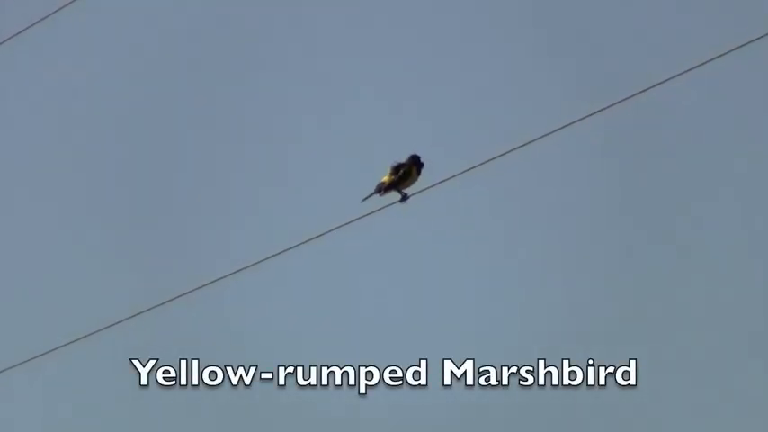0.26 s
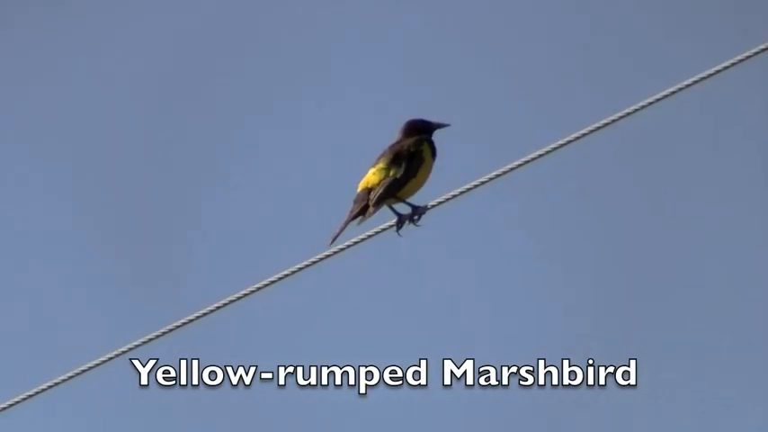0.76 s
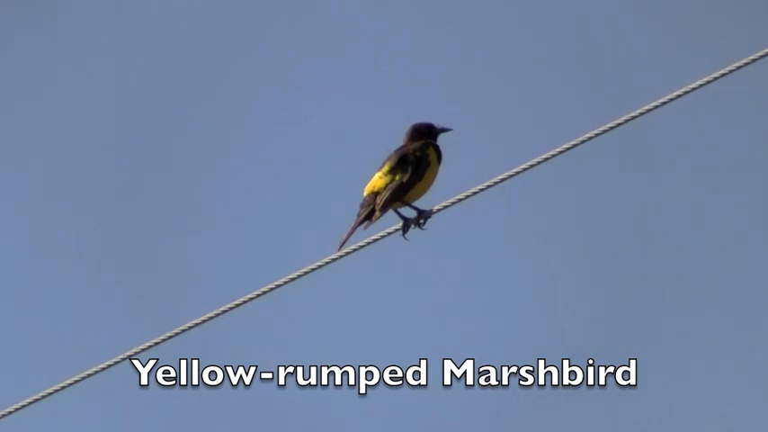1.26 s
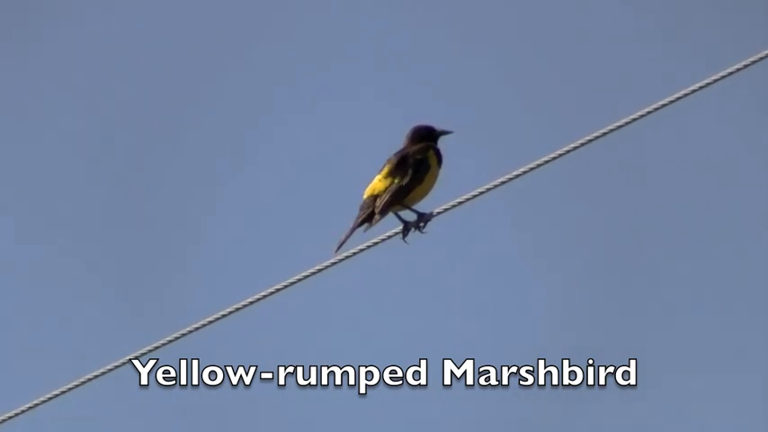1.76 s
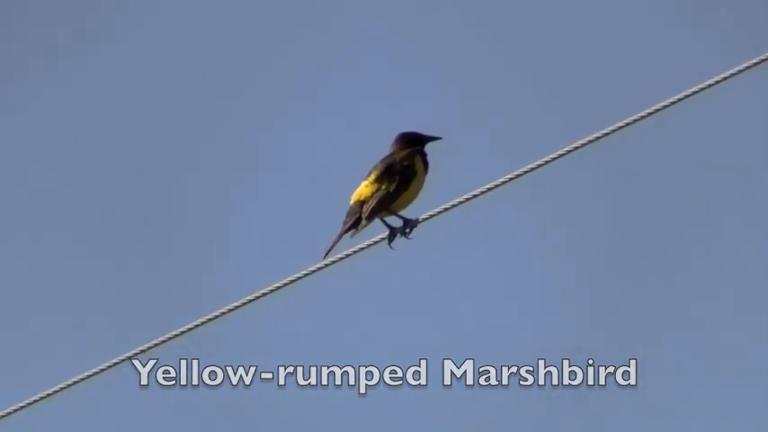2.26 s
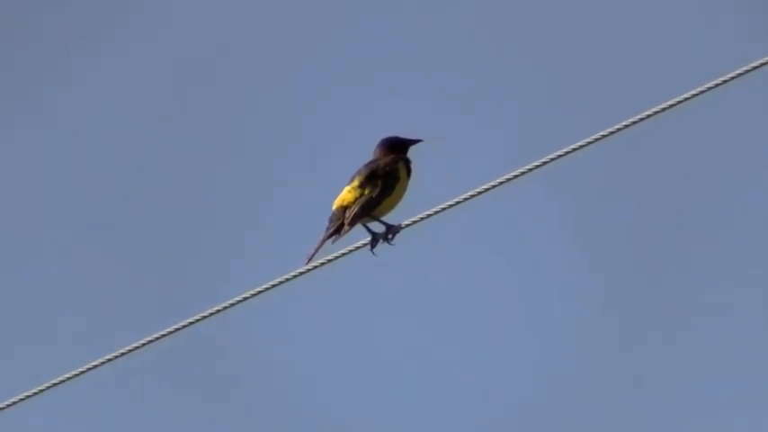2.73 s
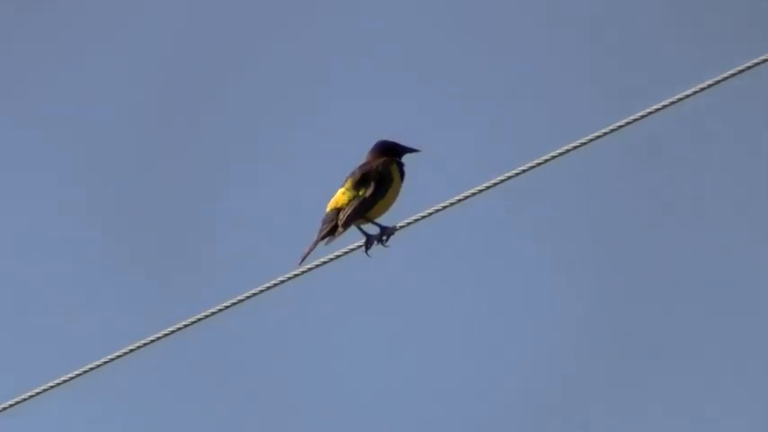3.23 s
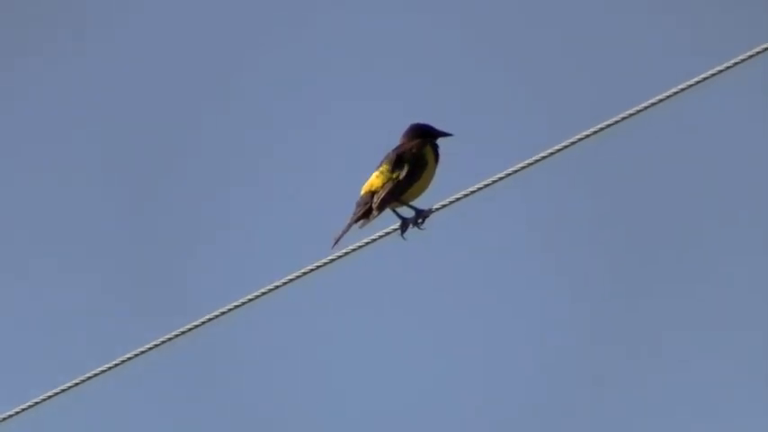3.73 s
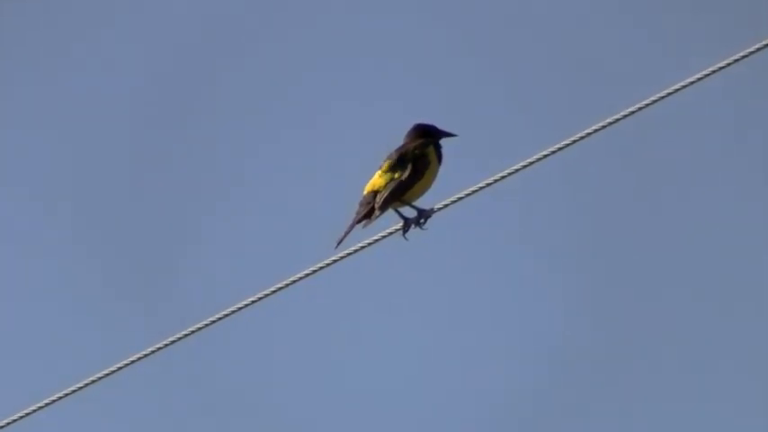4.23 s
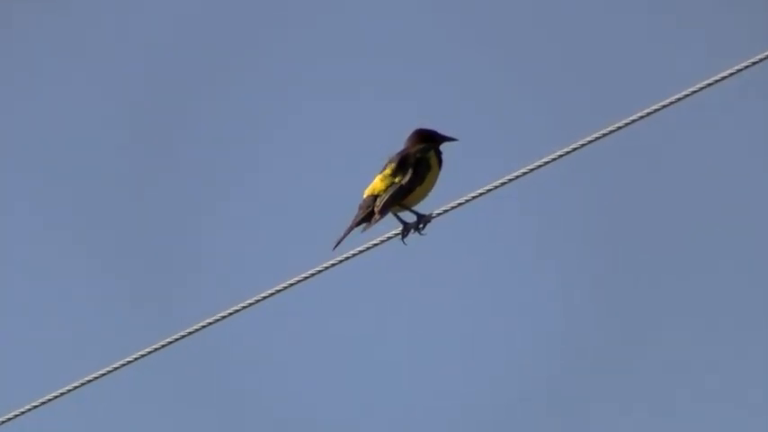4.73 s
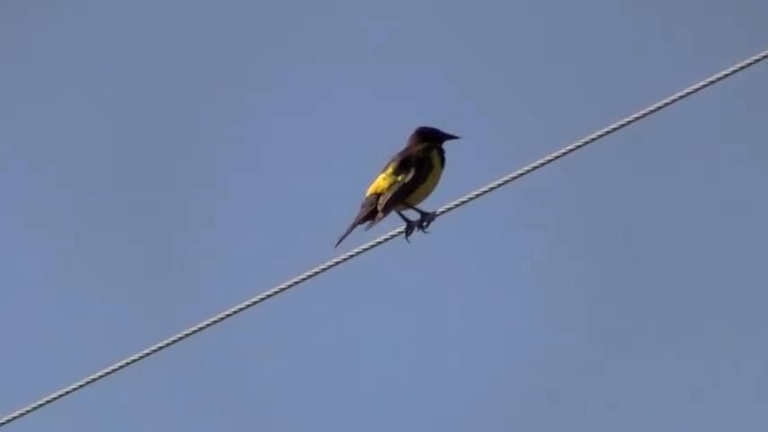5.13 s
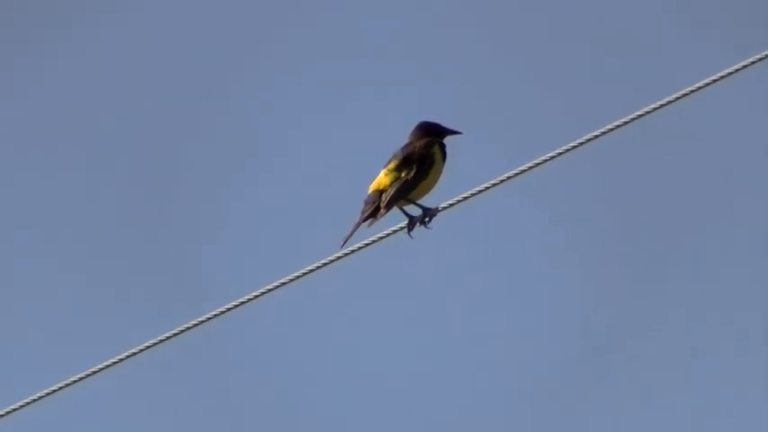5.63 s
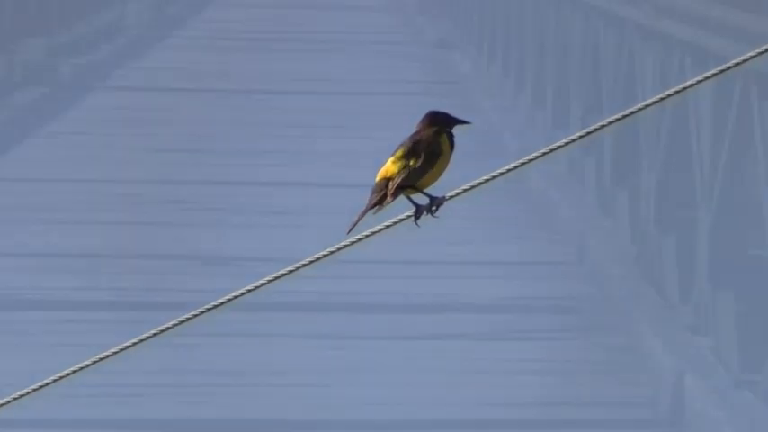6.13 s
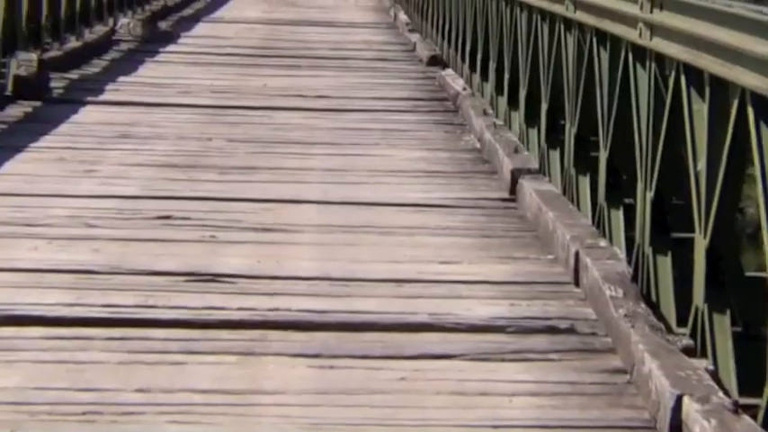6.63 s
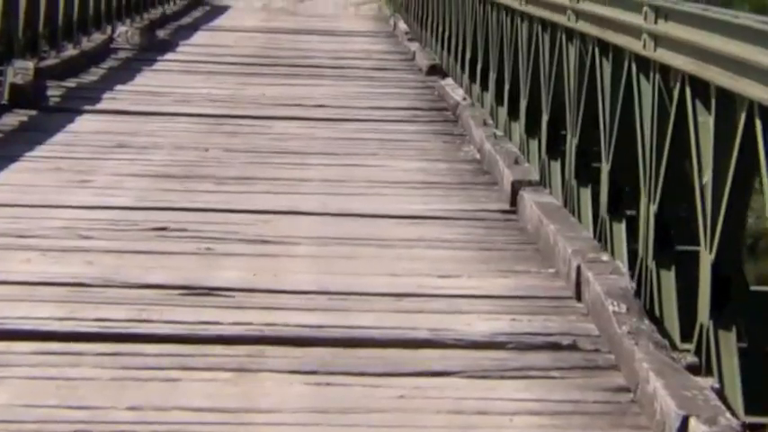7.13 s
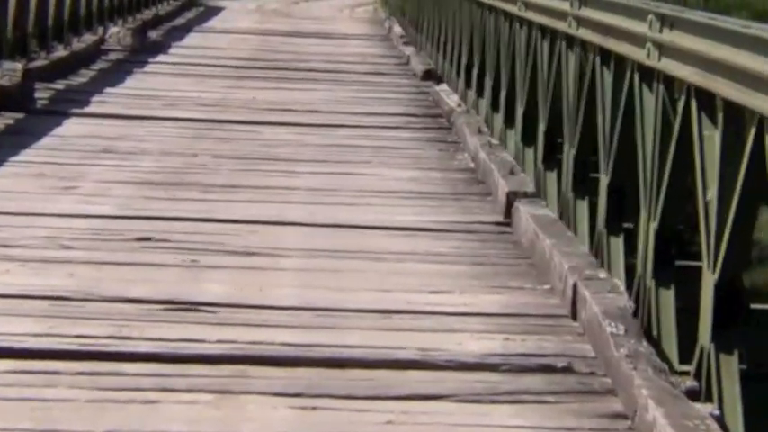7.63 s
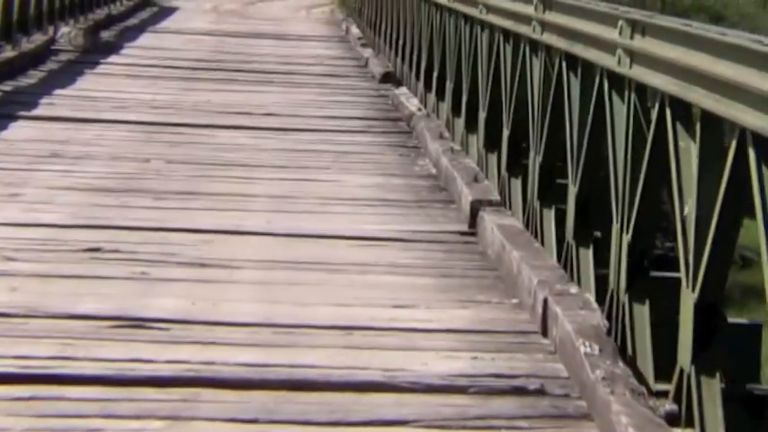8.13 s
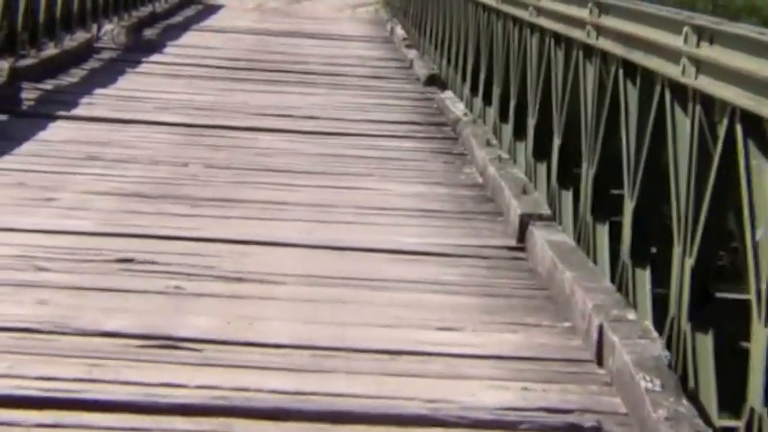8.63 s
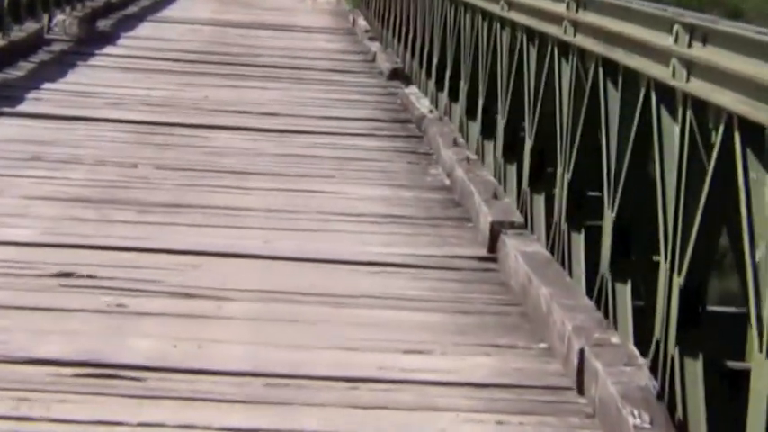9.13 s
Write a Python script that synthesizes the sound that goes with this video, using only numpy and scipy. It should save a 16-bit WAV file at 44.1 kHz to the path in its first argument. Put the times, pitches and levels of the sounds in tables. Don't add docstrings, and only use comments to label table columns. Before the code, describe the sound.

Faint birdsong and insect chirring over soft microphone wind give way to a vehicle creeping over a wooden bridge, boards knocking, booming and rattling steel.

```python
import sys
import numpy as np
from scipy import signal
from scipy.io import wavfile
from scipy.ndimage import uniform_filter1d

SR = 44100
rng = np.random.default_rng(int(sys.argv[2]) if len(sys.argv) > 2 else 0)


def makeup_ratio(level_db):
    decades = np.asarray(level_db, float) / 20
    return 10 ** decades


def to_wav(s):
    ch = np.atleast_2d(s).T
    pcm = np.round(np.clip(ch, -1, 1) * 32767)
    wavfile.write(sys.argv[1], SR, pcm.astype(np.int16))


N = 413216
T = np.arange(N) / SR


def rms_one(x):
    return x / np.sqrt(np.mean(x ** 2) + 1e-20)


def in_time(rows, t):
    s, *columns = np.transpose(rows)
    return [np.interp(t, s, c) for c in columns]


def drift(rate, t):
    r = np.exp(-80 * np.pi * rate / SR)
    noise = rng.standard_normal(len(t) // 40 + 2002)
    slow = rms_one(signal.lfilter([1], [1, -2 * r, r * r], noise)[2000:])
    return np.interp(np.arange(len(t)) / 40, np.arange(len(slow)), slow)


def swells(rows, t):
    return np.sqrt(sum((makeup_ratio(db) * np.exp(-.5 * ((t - s) / half) ** 2)) ** 2 for s, half, db in rows))


def tone(hz):
    return np.sqrt(2) * np.sin(2 * np.pi * np.cumsum(hz) / SR)


def ring(x, hz, t60):
    r, w = makeup_ratio(-60 / (t60 * SR)), 2 * np.pi * hz / SR
    return signal.lfilter([0, np.sin(w)], [1, -2 * r * np.cos(w), r * r], x + 1e-18)


def whistle(hz, width, t):
    t60 = np.log(1000) / np.pi / width
    once = ring(rng.standard_normal(len(t)), hz, t60)
    return rms_one(ring(once, hz, t60))


def bands(spectrum, source):
    hz, level_db = np.transpose(spectrum)
    octaves = np.log2(min(hz[-1], 19000) / hz[0])
    edges = hz[0] * 2 ** np.arange(0, octaves + .01, 1 / 3)
    for k, (low, high) in enumerate(zip(edges, edges[1:])):
        mid = np.sqrt(low * high)
        band = signal.butter(2, [low, high], "band", fs=SR, output="sos")
        level = makeup_ratio(np.interp(np.log(mid), np.log(hz), level_db))
        yield mid, level * signal.sosfilt(band, source[k % 2])


def coloured(spectrum, patchy_db, rate, t):
    together = drift(rate, t)
    parts = bands(spectrum, rng.standard_normal((2, len(t))))
    return rms_one(sum(makeup_ratio(patchy_db * (0.74 * together + drift(rate, t))) * part for hz, part in parts))


def grains(per_s, spread_db, t):
    sizes = makeup_ratio(spread_db * np.minimum(rng.exponential(1, len(t)), 4)) * rng.choice([-1, 1], len(t))
    return sizes * (rng.random(len(t)) < per_s / SR)


def knocks(t):
    # start in seconds, peak in dB, board pitch in Hz, brightness in dB
    seated = [(6.672, -20, 263, -16), (7.103, -23, 343, -3), (7.19, -21, 253, -24), (7.409, -22, 272, -7),
              (7.53, -14, 183, 1), (7.823, -11.5, 349, -40), (8.297, -30, 280, -14), (8.65, -17, 193, -4),
              (8.762, -6, 200, -22), (9.008, -8, 300, -8), (9.0535, -1.5, 215, -26), (9.281, -1, 300, -22)]
    # start in seconds, peak in dB, board pitch in Hz, brightness in dB
    free = [
        (7.986, -9.5, 269, -4),
        (8.029, -6.5, 247, -17),
        (8.3655, -11, 200, -6),
        (8.412, -11, 260, -4),
        (8.988, -6.5, 473, -11),
        (9.349, -5.5, 290, -32),
    ]
    # ratio to the board pitch, level in dB
    modes = [(1, 2.5), (1.4, -4.5), (1.8, -1), (2.2, -1), (2.7, -3), (3.3, -4.5), (4.0, -8), (4.9, -14),
             (6.0, -15)]
    seated_t60_s, free_t60_s = 0.059, .14
    size = 8000
    out = np.zeros(len(t) + size)
    rows = sorted([(*row, seated_t60_s) for row in seated] + [(*row, free_t60_s) for row in free])
    for (s, level_db, hz, bright_db, t60), luck in zip(rows, rng.standard_normal((len(rows), 1000))):
        blow = np.zeros(size)
        blow[:900] = 0.073 * luck[100:] * makeup_ratio(-60 * T[:900] / (t60 * 0.66))
        blow[0] = 1
        blow = signal.lfilter([1], [1, -1.5, .57], blow)
        knock = np.zeros(size)
        for k, (ratio, db) in enumerate(modes):
            mode_db = db + 1.4 * luck[k] + (bright_db + 9) * np.log2(ratio) / 2
            mode_hz = hz * ratio * (1 + 0.0803 * luck[k + 20])
            knock += (-1) ** k * makeup_ratio(mode_db) * ring(blow, mode_hz, t60 / np.sqrt(ratio))
        knock += makeup_ratio(bright_db / 2 + 12) * ring(np.diff(blow, prepend=0), 990, 0.0089)
        at = int((s + 0.001516 - t[0]) * SR)
        out[at:at + size] += makeup_ratio(level_db - 2.5) * knock / np.abs(knock).max()
    return signal.sosfilt(signal.butter(2, 60, "high", fs=SR, output="sos"), out[:len(t)])


def planks(t):
    # blow in seconds, mode in Hz, peak in dB, 60 dB decay in seconds
    modes = [(7.4439, 340, -5, .07), (7.4439, 1050, -13, .025), (7.4439, 716, -10, .08),
             (7.4439, 517, -17, .07), (7.464, 420, -16, .05), (7.464, 205, -17, .06),
             (8.3515, 330, -9, .07), (8.3515, 650, -10, .04), (8.369, 300, -10, .05), (8.375, 330, -9, .04),
             (8.369, 900, -16, .05), (8.4155, 700, -12, .06), (8.7903, 265, -3, .1),
             (8.7903, 1077, -3, .075), (8.7903, 540, -6, .12), (8.7903, 800, -8, .06),
             (8.7903, 1400, -13, .03), (8.798, 640, -6, .07), (9.103, 620, -2, .03), (9.103, 900, -8, .035),
             (9.1108, 420, -5, .09), (9.1133, 760, -8, .06), (9.1285, 285, -9, .1), (9.132, 285, -5, .1),
             (9.1395, 400, -9, .03), (9.158, 400, 0, .025), (9.1583, 651, -3, .08), (9.1583, 985, -7, .02),
             (9.1727, 506, -11, .07), (9.1727, 760, -7, .05), (9.1727, 996, -13, .05)]
    rise_s = .0009
    out, age = np.zeros(len(t) + 6000), T[:6000]
    for s, hz, level_db, t60 in modes:
        at = np.searchsorted(t, s - rise_s)
        level = makeup_ratio(level_db - 60 * age / t60) * np.minimum(age / rise_s, 1)
        out[at:at + len(age)] += level * np.cos(2 * np.pi * hz * (age - rise_s))
    return out[:len(t)]


def snaps(t):
    # start in seconds, peak in dB, ring in Hz, edge in dB
    contacts = [
        (7.4436, -13, 1300, -30),
        (8.7899, -17, 2100, -36),
        (8.9362, -38, 12000, -20),
        (9.1024, -14, 1900, -24),
        (9.1578, -9, 2200, -12),
        (9.028, -12, 1300, -20),
        (8.874, -12, 600, -24),
    ]
    ring_t60_s, edge_t60_s = .006, .004
    out, age = np.zeros(len(t)), T[:800]
    for s, level_db, hz, edge_db in contacts:
        at = np.searchsorted(t, s)
        overtone = .3 * np.sin(2 * np.pi * min(1.6 * hz, 15000) * age)
        body = makeup_ratio(-60 * age / ring_t60_s) * (np.sin(2 * np.pi * hz * age) + overtone)
        scrape = signal.lfilter([.2], [1, -1.3, .42], rng.standard_normal(len(age)))
        edge = makeup_ratio(edge_db - 60 * age / edge_t60_s) * scrape
        out[at:at + len(age)] += makeup_ratio(level_db) * (body + edge)
    return out


def thuds(t):
    # start in seconds, peak in dB, deck pitch in Hz, 60 dB decay in seconds
    pushes = [
        (7.519, -11, 91, 0.17),
        (7.73, -9, 76, 0.22),
        (8.05, -9, 93, 0.14),
        (8.1, -4, 65, 0.28),
    ]
    out = np.zeros(len(t))
    for s, level_db, hz, t60 in pushes:
        age = np.maximum(t - s, 0)
        level = makeup_ratio(level_db - 60 * age / t60) * np.minimum(age / 0.017, 1)
        out += level * np.sin(2 * np.pi * hz * age)
    return out


def bars(t):
    # start in seconds, pitch in Hz, level in dB, 60 dB decay in seconds
    singing = [(8.862, 4600, -26, .08), (8.863, 7260, -36, .1), (8.867, 5200, -32, .15),
               (8.876, 3290, -30, .2), (8.885, 2830, -32, .25), (8.923, 5300, -36, .1),
               (9.006, 7450, -38, .12), (9.009, 4600, -33, .15), (9.022, 3310, -32, .25),
               (9.03, 4810, -36, .2), (9.18, 4300, -33, .15), (9.174, 1920, -27, .2),
               (9.192, 2980, -31, .15), (9.306, 5800, -38, .2), (9.322, 2500, -27, .3),
               (9.33, 3790, -34, .3), (9.338, 2120, -27, .3), (9.318, 4300, -35, .15),
               (7.449, 600, -24, .14), (8.797, 700, -19, .15), (8.799, 1080, -21, .16),
               (8.866, 1120, -21, .3), (9.111, 780, -20, .2), (9.015, 1100, -17, .2),
               (8.935, 1050, -22, .25), (9.113, 1200, -21, .2), (8.36, 560, -18, .25),
               (7.982, 1400, -25, .15)]
    width_hz, rise_s = 420, .003
    out, age = np.zeros(len(t) + 12000), T[:12000]
    for s, hz, level_db, t60 in singing:
        at = np.searchsorted(t, s)
        level = makeup_ratio(level_db - 60 * age / t60) * np.minimum(age / rise_s, 1)
        out[at:at + len(age)] += level * whistle(hz, width_hz, age)
    return out[:len(t)]


def rattles(t):
    # start in seconds, level in dB, 60 dB decay in seconds, dullness in dB per octave, rise in seconds
    jolts = [
        (8.862, -15.5, 0.46, -5, .003),
        (8.925, -29, 0.42, -8.5, .005),
        (9.007, -19.5, 0.39, -6, .004),
        (9.172, -18, 0.32, -7.5, .008),
        (9.3, -22.5, 0.6, -7.5, .02),
        (7.985, -26, 0.17, -7, .006),
        (8.35, -28.5, 0.1, -4.5, .002),
        (7.443, -24, 0.057, -10.5, .001),
    ]
    # frequency in Hz, level in dB per Hz
    rail = [(290, -20.5), (500, -7), (830, -12), (1080, -3.5), (1440, -11.5), (2300, -7), (3240, -11),
            (4700, -9), (6300, -15), (8320, -15), (10500, -33), (16000, -62)]
    clicks = [grains(9000, 1.1, t), grains(9000, 2.5, t)]
    parts = [(hz, makeup_ratio(1.3 * drift(25, t)) * part) for hz, part in bands(rail, clicks)]
    norm = np.std(sum(part for hz, part in parts))
    out = np.zeros(len(t))
    for s, level_db, t60, tilt_db, rise in jolts:
        at = np.searchsorted(t, s)
        age = t[at:] - s
        for hz, part in parts:
            band_t60 = t60 * (hz / 2000) ** -.3
            dying = makeup_ratio(level_db + tilt_db * np.log2(hz / 2000) - 60 * age / band_t60)
            out[at:] += np.minimum(age / rise, 1) * dying * part[at:] / norm
    return out


def clatter(t):
    hits = grains(900 * makeup_ratio(3.3 * drift(12, t)), 1.36, t)
    dealt = rng.integers(0, 24, len(t))
    pitches = np.geomspace(130, 1400, num=24)
    return rms_one(sum((hz / 300) ** -.6 * ring(hits * (dealt == k), hz, 14 / hz)
                       for k, hz in enumerate(pitches)))


def engine(roar_db, t):
    # frequency in Hz, level in dB per Hz
    roar_colour = [(88, -33), (150, -7), (197, -9), (269, 4), (297, -2.5), (398, -5.5), (649, -7.5),
                   (759, -10.5), (1080, -12.5), (1500, -14), (2010, -19), (2360, -21), (6250, -32),
                   (8380, -35.5), (16000, -56.5)]
    # centre in Hz, width in Hz, level in dB
    bay_modes = [(1082, 520, -26.5), (2000, 400, -26.5), (2630, 140, -37.5), (3400, 2000, -34.5),
                 (4850, 1460, -36.5), (8240, 710, -42.5), (9950, 380, -47.5), (13000, 500, -60),
                 (15300, 1500, -59)]
    # multiple of the blade rate, level in dB
    fan = [(1, -31), (3, -42.5), (4, -43), (5, -55)]
    # time in seconds, level in dB
    fan_load = [(6.3, 0.0), (6.75, 0.0), (6.9, -5), (7.1, -4), (7.2, 0.0), (8.0, 1.5), (9.4, 0.0)]
    roar = makeup_ratio(roar_db + 13.5) * coloured(roar_colour, 0.67, 34, t)
    bay = sum(makeup_ratio(db - 11 + 1.3 * drift(36, t)) * whistle(hz, w, t) for hz, w, db in bay_modes)
    blade_hz = 268.4 * (1 + 0.00207 * drift(3, t))
    whine = sum(makeup_ratio(db + 1.4 * drift(5, t)) * tone(k * blade_hz) for k, db in fan)
    return roar + bay + makeup_ratio(in_time(fan_load, t)[0]) * whine


def bridge(t):
    # time in seconds, gain from 0 to 1
    fade = [(0, 0.021), (6.182, 0.0045), (6.38, 1), (9.4, 0.94)]
    # frequency in Hz, level in dB per Hz
    boom = [(12, -38), (20, -6.5), (64, 0.5), (102, 1.5), (198, -10.5), (250, -5.5), (320, -43),
            (550, -120)]
    # time in seconds, boom in dB
    flex = [(6.37, -23), (6.87, -28), (7.07, -29), (7.17, -21.5), (7.52, -19.5), (7.67, -26), (7.77, -19),
            (8.07, -14.5), (8.35, -23), (8.72, -20), (8.82, -24.5), (8.89, -22), (8.97, -33), (9.37, -30)]
    # time in seconds, clatter in dB
    roll_ons = [(6.47, -24), (6.72, -26), (7.17, -26), (7.46, -17), (7.88, -25), (8.06, -13.5), (8.39, -14),
                (8.67, -15.5), (8.97, -16.5), (9.06, -15), (9.28, -13)]
    # time in seconds, level in dB
    chatter = [(6.3, -29), (7.8, -32), (8.5, -21), (9.4, -20.5)]
    roll_half_s = .06
    rolls = swells([(s, roll_half_s, db) for s, db in roll_ons], t)
    rolling = np.hypot(makeup_ratio(in_time(chatter, t)[0]), rolls)
    deck = makeup_ratio(in_time(flex, t)[0]) * coloured(boom, 1.07, 20, t) + makeup_ratio(-4.0) * rolling * clatter(t)
    roar_db = -41 + 1.45 * (t - t[0])
    steady = in_time(fade, t)[0] * (deck + engine(roar_db, t))
    return steady + knocks(t) + thuds(t) + rattles(t) + bars(t) + snaps(t) + planks(t)


def whistled_notes():
    # time in seconds, pitch in Hz, level in dB
    song = [
        [(.0, 2700, -64), (.05, 2850, -57), (.075, 2390, -59), (.11, 2050, -58), (.14, 1900, -74)],
        [(.14, 2040, -62), (.156, 2430, -56), (.27, 2510, -65)],
    ]
    # start and length in seconds, top in Hz, depth in octaves, level in dB
    arches = [
        (2.348, .1, 3480, .56, -62),
        (2.637, .064, 6950, .45, -46.5),
    ]
    # start and length in seconds, top in Hz, depth in octaves, level in dB
    round_arches = [
        (3.638, .032, 3300, .3, -62),
        (4.441, .072, 6750, .45, -51),
    ]
    # start and length in seconds, first pitch in Hz,
    # fall in octaves, level in dB
    slides = [(.372, .135, 4900, .5, -69), (.3, .05, 2500, -.35, -73), (.35, .07, 3150, .02, -73),
              (.372, .02, 2500, -.03, -68), (.546, .01, 2100, .5, -60), (1.236, .006, 2800, -.35, -54),
              (2.631, .01, 4700, -.3, -58), (2.697, .01, 5300, .25, -57), (2.875, .05, 4000, .06, -67),
              (3.69, .03, 2950, .1, -65), (3.85, .02, 3100, .2, -63), (4.431, .014, 3900, -.6, -59),
              (5.403, .014, 2100, .6, -62), (2.445, .075, 2420, .07, -69), (2.37, .05, 4250, .03, -69),
              (2.612, .028, 4700, .33, -59), (2.66, .03, 5900, .27, -62), (3.17, .12, 4060, .27, -72),
              (3.76, .022, 8000, .11, -65), (4.355, .018, 8000, .19, -56.5), (5.21, .07, 3715, .04, -73),
              (5.992, .015, 7800, .05, -57), (6.058, .055, 3000, .34, -65), (5.55, .045, 2800, .24, -66),
              (5.8, .03, 2680, .04, -68), (1.975, .035, 3450, .08, -63)]
    pointed, rounded = 1.45, 2.3
    top_at, rise_share = .44, .55
    ends_db, settle = -8, 2.2
    u = np.linspace(0, 1, num=25)
    from_top = np.where(u < top_at, 1 - u / top_at, (u - top_at) / (1 - top_at))
    share = np.where(u < top_at, rise_share, 1)
    notes = list(song)
    for rows, bend in [(arches, pointed), (round_arches, rounded)]:
        for s, length, hz, depth, db in rows:
            pitch = hz * 2 ** (-depth * share * from_top ** bend)
            notes.append(np.c_[s + length * u, pitch, db + ends_db * from_top ** 1.5])
    for s, length, hz, fall, db in slides:
        pitch = hz * 2 ** (-fall * (1 - np.exp(-settle * u)))
        notes.append(np.c_[s + length * u, pitch, db + ends_db * (2 * u - 1) ** 2])
    return notes


def birds(t):
    # start in seconds, top in Hz, level in dB, fall in octaves
    chips = [(.527, 2860, -45.5, 0.78), (1.131, 2880, -50.5, 0.47), (1.239, 3620, -45.5, 1.05),
             (1.447, 3000, -59, 0.36), (1.61, 3160, -47, 0.091), (2.324, 2830, -49.5, 0.67),
             (3.23, 3120, -52.5, 0.091), (4.005, 2770, -47, 0.29), (5.384, 3090, -50.5, .9),
             (5.608, 2880, -44, .4), (6.032, 2660, -55, .04), (5.927, 2650, -64, .04)]
    out = np.zeros(len(t))
    flutter_db = 2.5 * np.sin(2 * np.pi * 85 * t)
    for note in whistled_notes():
        s, hz, level_db = np.transpose(note)
        span = (t >= s[0]) & (t < s[-1])
        ends = np.clip(np.minimum(t[span] - s[0], s[-1] - t[span]) / 0.0021, 0, 1)
        pitch = uniform_filter1d(np.interp(t[span], s, hz), size=250)
        level = makeup_ratio(np.interp(t[span], s, level_db) + flutter_db[span])
        out[span] += level * ends * tone(pitch)
    for s, hz, level_db, fall in chips:
        length = .0205 + .005 * fall
        span = (t >= s) & (t < s + length)
        u = (t[span] - s) / length
        pitch = hz * 2 ** (-fall * (u ** 3.8 + 0.21 * (1 - u) ** 8))
        ends = np.minimum(1, 3.6 * np.minimum(u, 1 - u))
        out[span] += makeup_ratio(level_db - 5.5 * u ** 2) * ends * tone(pitch)
    reeds = rng.standard_normal(8000) * makeup_ratio(-60 * t[:8000] / .4)
    echo = makeup_ratio(-22) * np.roll(out, int(0.01 * SR))
    tail = makeup_ratio(-40.0) * signal.fftconvolve(out, reeds)[:len(t)]
    return out + echo + tail


def chirps(song, duty, edge, t):
    place = (in_time(song, t)[0] + .5) % 1 - .5
    gate = np.clip((duty / 2 - np.abs(place)) / max(edge, .01) + .5, 0, 1)
    return place, gate * (t > song[0][0])


def insects(t):
    # time in seconds, chirps sung so far
    low_song = [(2.5854, 2.5), (5.0568, 42.5)]
    high_song = [(.7, -.08), (6.4, 72.82)]
    rival_song = [(.7, .86), (6.4, 76.06)]
    near_song = [(.7, .85), (6.4, 289.4)]
    far_song = [(.7, 1.05), (6.4, 286.3)]
    # time in seconds, high cricket in dB, near buzzer in dB, far buzzer in dB
    chorus = [(.7, -72, -76, -68), (1.6, -70, -71, -70), (2.5, -69, -62, -77), (3.4, -68, -63, -69),
              (4.2, -63, -70, -65), (5.0, -62.5, -70, -69), (6.2, -64.5, -65, -71)]
    # time in seconds, rival cricket in dB
    rival_level = [(.7, -74), (1.4, -72), (2.4, -70), (2.9, -76), (6.4, -80)]
    # centre in Hz, width in Hz, level in dB
    near_wings = [(9490, 110, -3.5), (9190, 78, -6)]
    far_wings = [(8930, 120, -2.5), (8620, 700, -3)]
    high_db, near_db, far_db = in_time(chorus, t)

    place, gate = chirps(low_song, 0.3, 0.11, t)
    low_db = -62.5 + 1.4 * (t - low_song[0][0])
    low_db += 1.3 * drift(1.8, t) + 1.5 * np.sin(2 * np.pi * 5.3 * t) ** 3
    low_db -= 6.0 * (t > low_song[1][0] - .06)
    low = makeup_ratio(low_db) * gate * tone(2745 * (1 - .07 * place))

    place, gate = chirps(high_song, 0.52, 0.17, t)
    pure = tone(6810 * (1 + .008 * place + 0.0019 * drift(60, t)))
    high = makeup_ratio(high_db + 1.5 * drift(30, t)) * gate * (pure + .5 * whistle(6820, 200, t))
    blur = makeup_ratio(-77.0 + 1.2 * drift(3, t)) * whistle(6820, 140, t) * (t > high_song[0][0])

    place, gate = chirps(rival_song, 0.5, 0.2, t)
    rival = makeup_ratio(in_time(rival_level, t)[0]) * gate * tone(6850 * (1 + .006 * place))

    place, gate = chirps(near_song, 0.51, .15, t)
    near = makeup_ratio(near_db - 1.0 + .9 * drift(20, t)) * gate * tone(9420 * (1 - .06 * place))
    near_buzz = sum(makeup_ratio(db) * whistle(hz, w, t) for hz, w, db in near_wings)
    near += (makeup_ratio(near_db - 6) * gate + makeup_ratio(-73)) * near_buzz

    place, gate = chirps(far_song, 0.67, 0.33, t)
    far = makeup_ratio(far_db + 1.5 * drift(20, t)) * gate * tone(8730 * (1 - .04 * place))
    far_buzz = sum(makeup_ratio(db) * whistle(hz, w, t) for hz, w, db in far_wings)
    far += (makeup_ratio(far_db - 6) * gate + makeup_ratio(-70.5)) * far_buzz
    return low + high + blur + rival + near + far


def hand(t):
    # start in seconds, length in seconds, level in dB, centre in Hz
    touches = [(0.895, 0.089, -54, 1600), (.9785, 0.011, -42, 2400), (.989, .007, -50, 2400),
               (0.772, 0.16, -61.5, 3200), (1.03, 0.025, -60, 2800), (1.15, 0.06, -59, 2400),
               (1.185, 0.085, -52, 1900), (1.276, 0.082, -50, 2000), (1.618, 0.068, -57, 3300),
               (1.683, 0.015, -47.5, 4500), (1.69, .03, -56, 4600), (1.848, 0.32, -60.5, 3000),
               (2.032, 0.062, -54.5, 700), (2.09, 0.048, -55, 800), (2.1, 0.06, -60, 2200),
               (2.159, .012, -51, 3900), (2.56, 0.18, -59.5, 2200), (2.652, 0.0074, -56, 2200),
               (2.804, 0.011, -46, 1900), (2.804, .01, -50, 3900), (2.277, .006, -62, 5500),
               (1.17, .17, -60, 5000), (3.853, .01, -62, 4500), (2.843, 0.32, -57.5, 2100),
               (3.004, 0.0091, -52, 3900), (3.105, 0.014, -57, 1600), (3.448, .04, -59, 3500),
               (5.053, .008, -59, 2800), (5.089, .012, -55, 4000)]
    out = np.zeros(len(t))
    skin = rng.standard_normal(len(t)) * makeup_ratio(2.5 * drift(150, t))
    for s, length, level_db, hz in touches:
        span = (t >= s) & (t < s + length)
        u = (t[span] - s) / length
        octaves, rise_s = (3.06, .015) if length > .05 else (1.5, .0016)
        half = 2 ** (octaves / 2)
        band = signal.butter(3, [hz / half, hz * half], "band", fs=SR, output="sos")
        scratch = signal.lfilter([1], [1, -.6], signal.sosfilt(band, skin[span]))
        swell = np.minimum(u * length / rise_s, 1) * np.sin(np.pi * (0.13 + 0.77 * u) ** 0.77)
        out[span] += makeup_ratio(level_db) * swell * rms_one(scratch)
    return out


def marsh(t):
    # time in seconds, gain from 0 to 1
    fade = [(0, 1), (.57, 1), (.675, .012), (.77, 1), (6.18, 1), (6.38, 0)]
    # time in seconds, level in dB
    gusts = [(0, -53), (.35, -58), (.6, -57), (.8, -46), (1.0, -52), (1.8, -53), (2.1, -48), (2.6, -46.5),
             (2.82, -52.5), (3.0, -42), (3.2, -51), (4.0, -52), (4.27, -45.5), (4.6, -54), (4.8, -48.5),
             (5.4, -54), (5.6, -50), (6.1, -57)]
    # time in seconds, half length in seconds, level in dB
    shifts = [
        (.97, 0.088, -53.5),
        (1.3, 0.13, -59),
        (2.07, .1, -57.5),
        (2.95, 0.18, -51.5),
        (4.5, .2, -64),
    ]
    # time in seconds, level in dB
    hum = [(3.35, -86), (3.55, -66), (4.0, -65.5), (4.2, -90)]
    # frequency in Hz, level in dB per Hz
    wind_colour = [(12, -36), (20, -7.5), (76, -0.5), (193, -8.5), (225, -10.5), (331, -24), (400, -33.5),
                   (520, -33), (880, -120)]
    handling_colour = [(88, -39), (150, -8), (231, -12), (320, -1.5), (563, -7.5), (669, -8.5),
                       (2000, -28.5), (2600, -57), (4400, -120)]
    air_colour = [(180, 5), (300, -1.5), (1780, -11.5), (2740, -11), (2930, -13), (5790, -18),
                  (6610, -23.5), (7310, -24.5), (9220, -8.5), (10000, -24), (16000, -24)]
    wind = makeup_ratio(in_time(gusts, t)[0] - 1.1) * coloured(wind_colour, 2.04, 11.0, t)
    grip = np.hypot(makeup_ratio(-62), swells(shifts, t))
    handling = grip * coloured(handling_colour, 1.7, 22, t)
    air = makeup_ratio(-60) * coloured(air_colour, 0.97, 2.3, t) + makeup_ratio(-64) * rng.standard_normal(len(t))
    moan = makeup_ratio(in_time(hum, t)[0]) * tone(440 * (1 + 0.013 * drift(6.0, t)))
    return in_time(fade, t)[0] * (wind + handling + air + moan + insects(t) + birds(t) + hand(t))


def scene():
    marsh_end, bridge_start = int(6.4 * SR), int(6.1 * SR)
    out = np.zeros((1, N))
    out[0, :marsh_end] += marsh(T[:marsh_end])
    out[0, bridge_start:] += bridge(T[bridge_start:])
    return out


def ducked(x):
    from_db, share, back_db_per_s, attack_s = -2.2, .5, 24, .012
    over_db = share * np.maximum(20 * np.log10(np.abs(x) + 1e-9) - from_db, 0)
    creep_db = back_db_per_s * T
    held_db = np.maximum.accumulate(over_db + creep_db, axis=1) - creep_db
    r = np.exp(-1 / (attack_s * SR))
    return x * makeup_ratio(-signal.lfilter([1 - r], [1, -r], held_db))


def top_cut(x):
    return signal.sosfilt(signal.butter(12, 15790, fs=SR, output="sos"), x)


def record(dry):
    even = ducked(dry)
    loud = even / (1 + np.abs(even / .97) ** 12) ** (1 / 12)
    mix = signal.sosfilt(signal.ellip(10, .3, 80, 15800, fs=SR, output="sos"), loud)
    return top_cut(mix)


dry = scene()
out = record(dry)
to_wav(out)
```